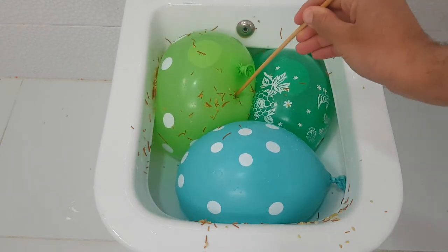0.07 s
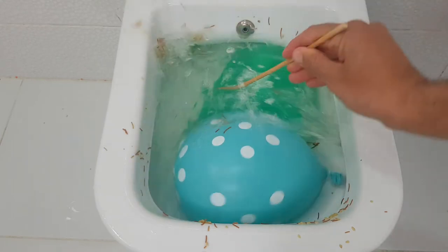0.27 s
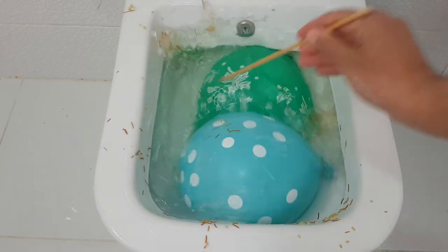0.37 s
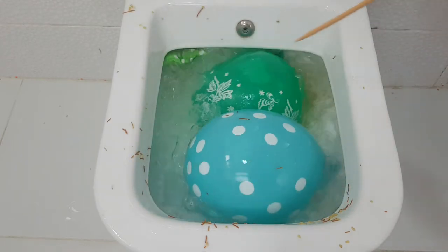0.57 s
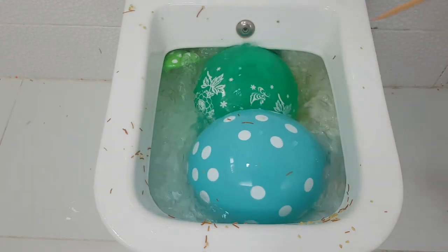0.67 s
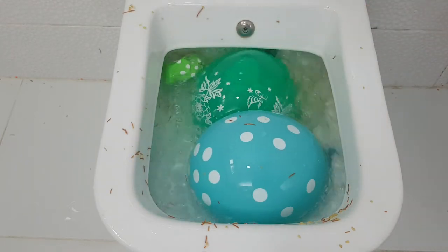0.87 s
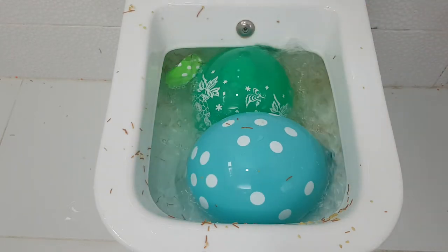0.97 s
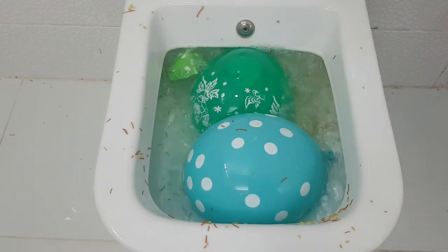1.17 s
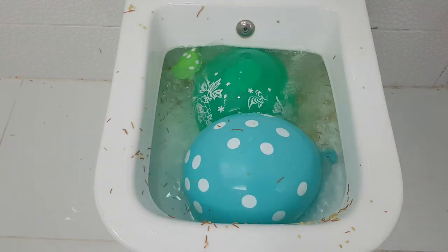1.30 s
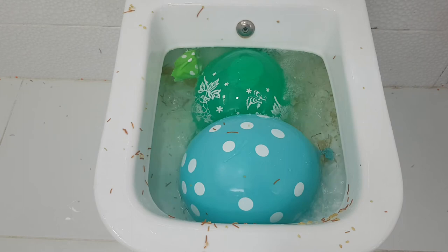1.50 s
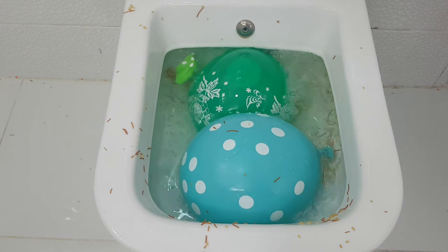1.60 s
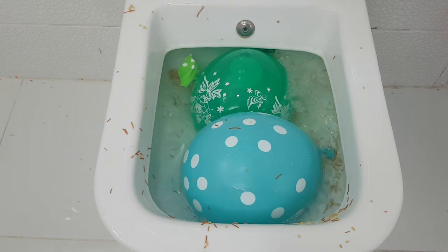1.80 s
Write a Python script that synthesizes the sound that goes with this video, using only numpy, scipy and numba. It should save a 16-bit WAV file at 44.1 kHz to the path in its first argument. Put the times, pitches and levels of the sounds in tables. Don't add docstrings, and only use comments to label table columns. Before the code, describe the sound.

In a hard-walled bathroom, heard close in stereo, stretched rubber snaps sharply; bubbly water rushes into a basin with hollow gulps, spray and low thumps, then a second plopping slosh, droplet ticks and near silence.

```python
import sys
import numpy as np
from scipy import signal
from scipy.fft import rfft, irfft, next_fast_len
from scipy.io import wavfile
from numba import njit

SR = 44100
rng = np.random.default_rng(int(sys.argv[2]) if len(sys.argv) > 2 else 0)


def elevation(decibels):
    levels = np.asarray(decibels, float)
    return 10 ** (levels / 20)


def inscribe(sig):
    pcm = np.round(np.clip(np.atleast_2d(sig).T, -1, 1) * 32767)
    wavfile.write(sys.argv[1], SR, pcm.astype(np.int16))


N = 81585


def read(table, x, log=False, axis=1):
    a = np.array(table, float)
    if log:
        return np.interp(np.log(x + 1), np.log(a[:, 0] + 1), a[:, axis])
    return np.interp(x, a[:, 0], a[:, axis])


def colour(x, gain):
    size = next_fast_len(2 * N)
    return irfft(rfft(x, size) * gain(np.fft.rfftfreq(size, 1 / SR)), size)[..., :N]


def unit(x):
    return x / np.sqrt(np.mean(x ** 2))


def pair():
    # freq_hz, likeness (0-1)
    likeness = [(60, 1), (150, .95), (300, 0), (600, 0.3), (1200, 0), (16000, 1)]
    like = lambda f: np.clip(read(likeness, f, True), 0, 1)
    mid = colour(rng.standard_normal(N), lambda f: np.sqrt((1 + like(f)) / 2))
    side = colour(rng.standard_normal(N), lambda f: np.sqrt((1 - like(f)) / 2))
    return np.array([mid + side, mid - side])


def burst(start_s, decay_s):
    t = np.arange(N) / SR - start_s
    return (t >= 0) * np.exp(-np.maximum(t, 0) / decay_s)


@njit
def ring(count, start_s, pitch_hz, cycles, size, glide, swell_cycles):
    out = np.zeros(count)
    for k in range(len(start_s)):
        i = int(start_s[k] * SR)
        hz = pitch_hz[k]
        phase = 0.
        while phase < cycles[k] and i < count and hz < .45 * SR:
            decay = np.exp(-6.9 * phase / cycles[k])
            swell = 1 - np.exp(-phase / swell_cycles)
            out[i] += size[k] * np.sin(2 * np.pi * phase) * decay * swell
            phase += hz / SR
            hz *= 1 + glide * hz / SR
            i += 1
    return out


def ring_events(table):
    start_s, level_db, pitch_hz, cycles = np.array(table, float).T
    return ring(N, start_s.copy(), pitch_hz.copy(), cycles.copy(), elevation(level_db), .001, 1.)


def room_tone():
    # freq_hz, density_db (per Hz)
    hush_colour = [(20, -10.5), (154, -8), (600, -21), (3000, -17.5), (7000, -23.5), (9500, -31),
                   (13000, -25.5), (16000, -29.5)]
    return unit(colour(pair(), lambda f: elevation(read(hush_colour, f, True)))) * elevation(-68.5)


def rub():
    # start_s, level_db
    strokes = [
        (0, -64.5),
        (.1, -62),
        (.2, -60),
        (.3, -76.5),
    ]
    # freq_hz, gain_db
    rub_colour = [(35, -62), (60, -35.5), (128, -17.5), (446, -4.5), (714, -34.5), (859, -17.5),
                  (2340, -18), (8000, -57), (10400, -84), (17600, -120)]
    friction = unit(colour(pair(), lambda f: elevation(read(rub_colour, f, True))))
    return friction * elevation(read(strokes, np.arange(N) / SR))


def tear():
    # start_s, level_db, decay_s
    cracks = [
        (.2158, 3, .0007),
        (.2165, -6, .012),
        (.2198, 0.5, .0013),
        (.2232, -8, .003),
    ]
    # freq_hz, gain_db
    crack_colour = [(200, -17.5), (800, -5), (3000, -6), (7000, -11), (12500, -6.5), (16000, -2.5)]
    gate = sum(elevation(db) * burst(start_s, decay_s) for start_s, db, decay_s in cracks)
    return colour(pair(), lambda f: elevation(read(crack_colour, f, True))) * gate


def churn():
    # start_s, bubbles_db, spray_db
    flow = [(.216, -75, -92), (.225, -28, -56), (.3, -28.5, -41), (.45, -28, -48), (.55, -31.5, -43.5),
            (.63, -29.5, -39), (.68, -40, -58.5), (.8, -49, -53.5), (.92, -41, -51), (1.0, -36, -51),
            (1.13, -50.5, -68.5), (1.25, -54.5, -66), (1.33, -78.5, -86.5)]
    bubbles_per_s, middle_hz, spread_octaves, cycles = 1100, 1069.5, 0.764, 9
    spread_db, biggest_db, tilt_db_per_octave = 2.5, 7.5, 0.5
    wait, chance = rng.random((4000, 2)).T
    start_s = np.cumsum(-np.log(1 - wait)) / bubbles_per_s
    octave = spread_octaves * rng.standard_normal(len(start_s))
    size_db = np.minimum(-spread_db * np.log(1 - chance), biggest_db) + tilt_db_per_octave * octave
    pitch_hz = middle_hz * 2 ** octave
    swarm = ring(N, start_s, pitch_hz, cycles + 0 * start_s, elevation(size_db), .011, 1.)

    spray_hz = 3500
    grit = pair() * elevation(-2.5 * np.log(1 - rng.random(N)))
    spray = colour(grit, lambda f: f ** 2 / (f ** 2 + spray_hz ** 2))
    t = np.arange(N) / SR
    return elevation(read(flow, t)) * unit(swarm) + elevation(read(flow, t, axis=2)) * unit(spray)


def nudges():
    # start_s, level_db, pitch_hz, cycles (to -60 dB)
    thumps = [
        (.22, -40, 60, 8),
        (.27, -38, 95, 10),
        (.3, -34, 160, 14),
        (.36, -42, 85, 10),
        (.53, -44, 80, 12),
        (.678, -29, 65, 7),
        (.73, -38, 50, 6),
        (.83, -48, 70, 5),
    ]
    return ring_events(thumps) * np.array([[.4], [1]])


def room(x):
    # freq_hz, t60_s
    dying = [(60, 1), (150, 1), (500, 0.58), (2000, 0.79), (6000, 0.94), (14000, 0.32)]
    # freq_hz, level_db
    echo_colour = [(60, 4.5), (200, -8.5), (500, -1.5), (1500, 0.5), (5000, -0.5), (14000, -7)]
    # pitch_hz, level_db, t60_s
    modes = [(150, 3, .6), (240, -1, .6), (430, -5, .3), (478, -5, .3), (640, -1, .35), (730, -2, .35),
             (915, 0.5, .6), (1120, -3, .4), (1500, -3, .4)]
    level_db, modes_db, late_s, rise_s = 3.5, -6, 0.0062, 0.0048
    t = np.arange(N) / SR
    noise, tail = pair(), 0
    for hz in 50 * 2 ** np.arange(0, 8.6, .5):
        band = colour(noise, lambda f: np.cos(np.pi * np.clip(np.log2((f + 1) / hz), -.5, .5)))
        fall_db = 60 * t / read(dying, hz, True)
        tail = tail + elevation(read(echo_colour, hz, True) - fall_db) * band
    standing = 0
    for (hz, db, t60_s), phase in zip(modes, rng.random(len(modes))):
        standing = standing + elevation(db - 60 * t / t60_s) * np.sin(2 * np.pi * (hz * t + phase))
    tail = tail + elevation(modes_db - 19) * standing
    onset = np.clip((t - late_s) / rise_s, 0, 1)
    tail = tail * onset * elevation(level_db) / np.sqrt(SR / 20)
    return signal.fftconvolve(x[None], tail, axes=1)[:, :N]


def pockets():
    # start_s, level_db (peak), pitch_hz, cycles (to -60 dB)
    gulps = [(.226, -16, 800, 38), (.242, -16.5, 760, 26), (.27, -14, 1414, 41), (.2965, -8, 700, 34),
             (.303, -14, 480, 50), (.3095, -10, 640, 40), (.328, -10, 478, 36), (.333, -11, 637, 40),
             (.345, -13, 520, 10), (.385, -22.5, 516, 14.5), (.41, -21, 705, 17.5), (.44, -17, 441, 24),
             (.49, -16, 450, 17), (.52, -41, 151.4, 77), (.51, -37, 237.2, 151), (.582, -1, 1150, 4),
             (.63, -24, 1100, 43), (.682, -16, 720, 12.5), (.746, -21, 804, 25.5), (.935, -32.5, 145.3, 28),
             (.8846, -20, 2000, 22), (.9277, -1.5, 1200, 8), (.957, -18, 1000, 9), (1.13, -27, 1500, 20),
             (1.133, -29, 2200, 30), (.944, -19.5, 503, 42), (1.763, -55, 680, 13.5),
             (1.791, -51, 1670, 35.5), (1.809, -46, 1650, 25.5), (1.835, -55.5, 1630, 56.5)]
    return ring_events(gulps)


def ticks():
    moments = [.27, .554, .556, .554, .828, .969, .968, .9995, 1.012, 1.131, 1.150, 1.150, 1.150, 1.165,
               1.233]
    # level_db, centre_hz, width_octaves, decay_s
    patters = [(-22.5, 2200, 0.1, 0.027), (-24.5, 4100, 0.17, 0.0034), (-31, 2370, 0.67, 0.1),
               (-41, 11000, 1.8, 0.024), (-44.5, 7200, 0.08, .006), (-44, 13000, 0.22, 0.0042),
               (-37.5, 2570, 0.5, 0.025), (-35.5, 4200, 0.74, .002), (-44.5, 5160, 0.49, 0.031),
               (-44, 10000, 1.04, .002), (-33, 9500, 0.77, 0.002), (-46.5, 9800, 0.34, 0.055),
               (-39.5, 5010, 0.13, 0.0047), (-52, 5240, 0.45, 0.057), (-48.5, 4600, 0.34, 0.019)]
    noise, out = pair(), 0
    for start_s, (db, hz, width, decay_s) in zip(moments, patters):
        band = unit(colour(noise, lambda f: np.exp(-(np.log2((f + 1) / hz) / width) ** 2)))
        out = out + elevation(db) * burst(start_s, decay_s) * band
    return out


def capsule(x):
    # freq_hz, gain_db
    response = [(40, -21), (120, 2.5), (300, 0), (7500, 1), (9500, -9), (12500, 2.5), (15500, -6)]
    return colour(x, lambda f: elevation(read(response, f, True)))


def scene():
    skin, water, air, drops = tear(), churn(), pockets(), ticks()
    sent = elevation(0.1) * skin + elevation(-1) * water + elevation(-8.5) * air + elevation(-9) * drops
    heard = skin + water + air + drops + room(sent.mean(axis=0))
    return capsule(heard) + room_tone() + rub() + nudges()


def top_cut(x):
    return signal.sosfilt(signal.butter(12, 16820, fs=SR, output="sos"), x)


def record(dry):
    # freq_hz, left_over_right_db
    balance = [(25, -13), (60, -10.5), (200, -6.5), (1000, -8), (2500, -4.5), (5000, -3.5), (9000, 1),
               (16000, 2)]
    lag_s, lag_from_hz, top_hz = .000025, 3000, 15750
    side = np.array([[1], [-1]])
    lean = lambda f: elevation(side * read(balance, f, True) / 2)
    lag = lambda f: np.exp(1j * np.pi * f * side * lag_s * f ** 2 / (f ** 2 + lag_from_hz ** 2))
    limit = lambda f: 1 / np.sqrt(1 + (f / top_hz) ** 200)
    ports = colour(dry, lambda f: lean(f) * lag(f) * limit(f))
    return top_cut(ports)


dry = scene()
out = record(dry)
inscribe(out)
```